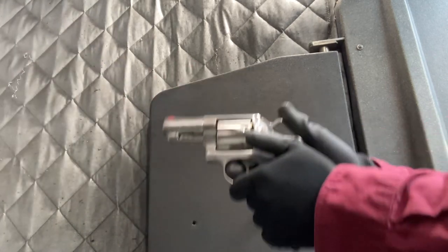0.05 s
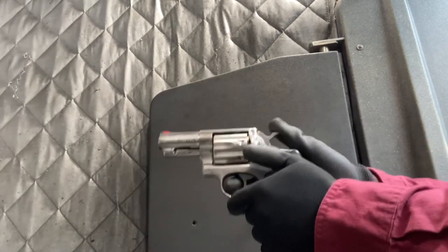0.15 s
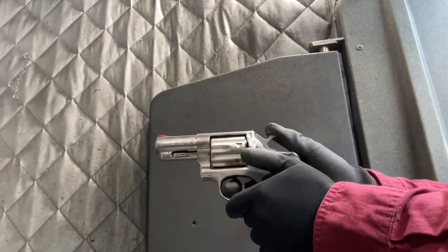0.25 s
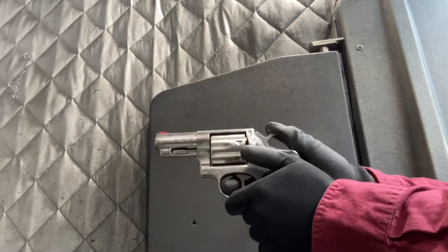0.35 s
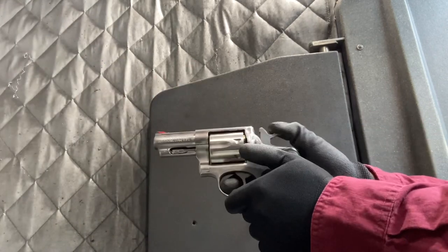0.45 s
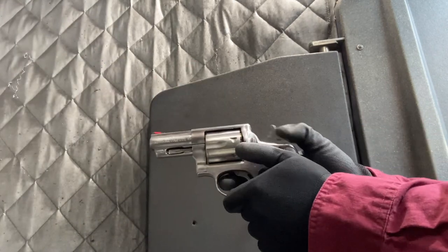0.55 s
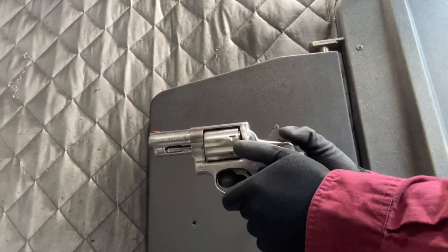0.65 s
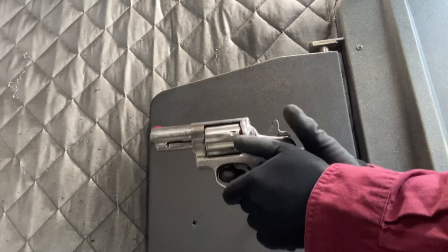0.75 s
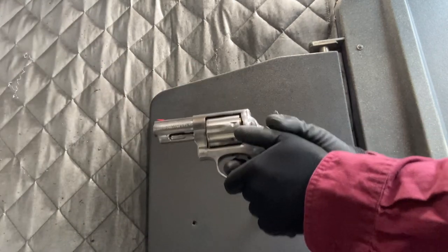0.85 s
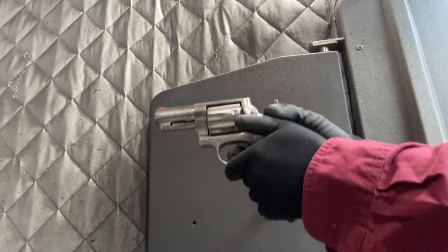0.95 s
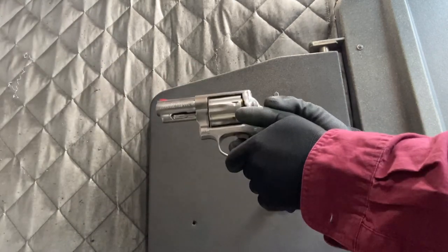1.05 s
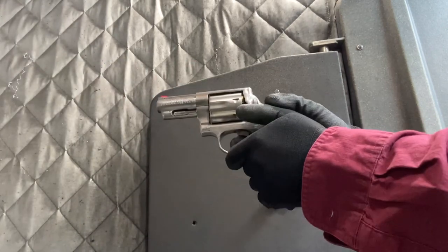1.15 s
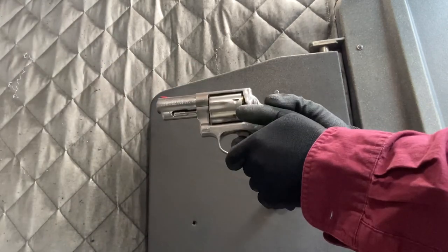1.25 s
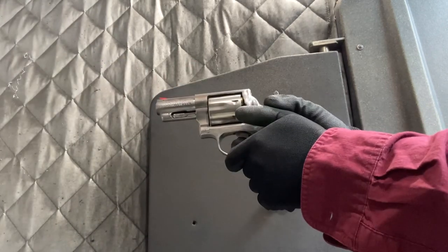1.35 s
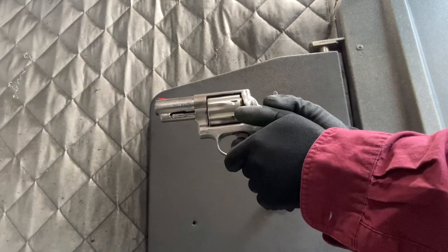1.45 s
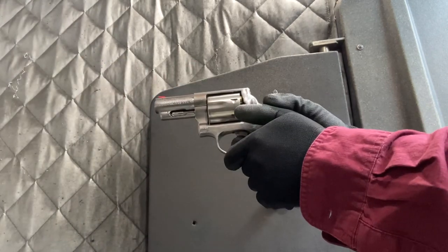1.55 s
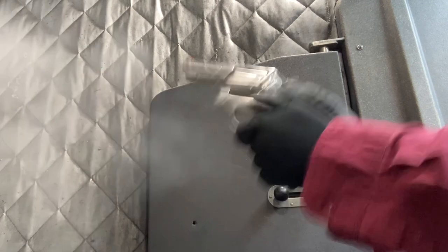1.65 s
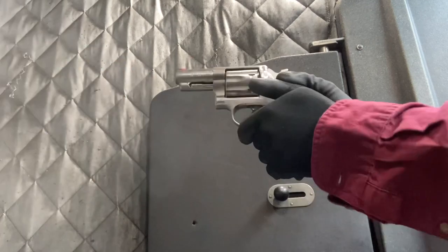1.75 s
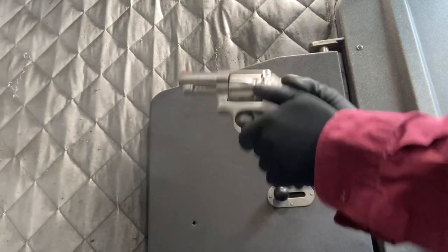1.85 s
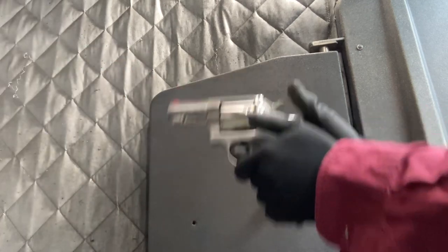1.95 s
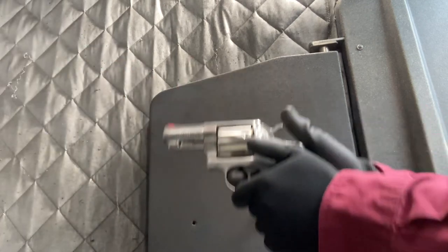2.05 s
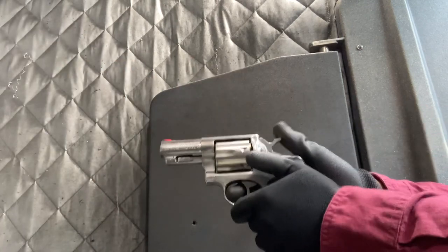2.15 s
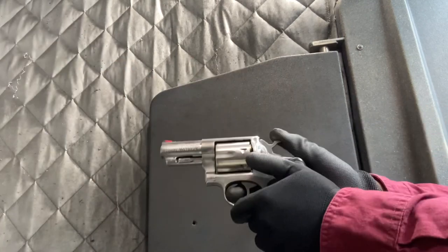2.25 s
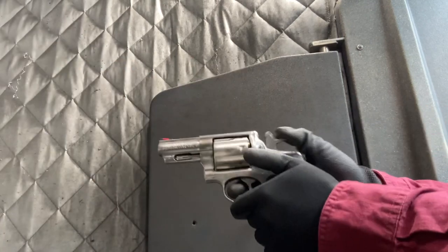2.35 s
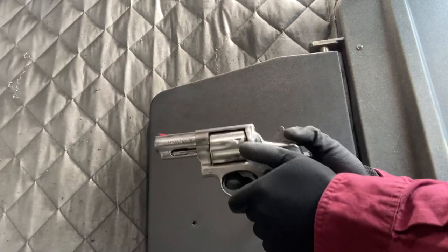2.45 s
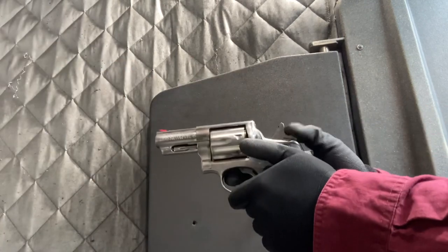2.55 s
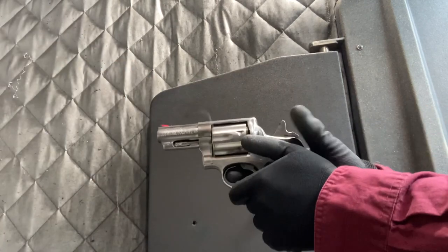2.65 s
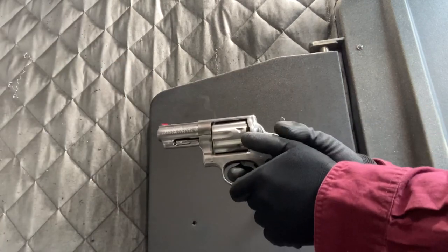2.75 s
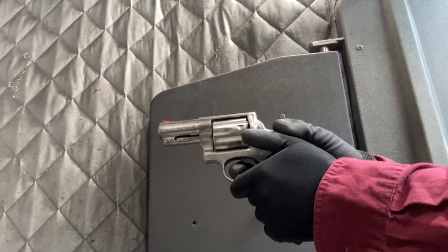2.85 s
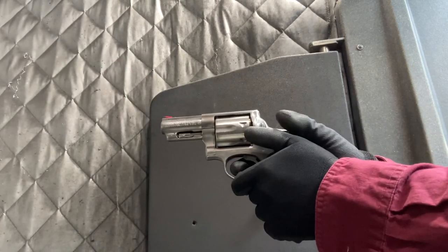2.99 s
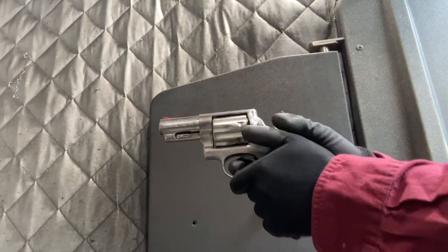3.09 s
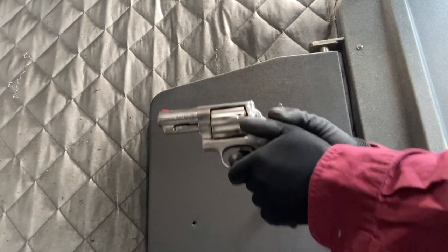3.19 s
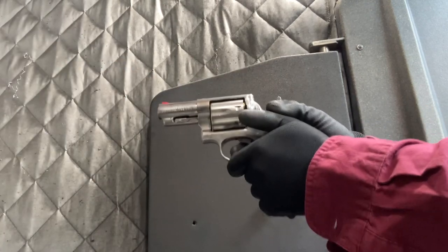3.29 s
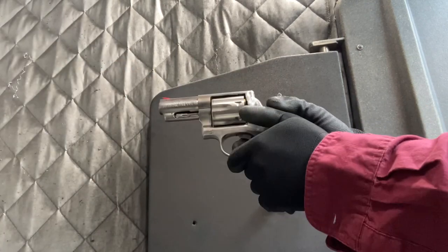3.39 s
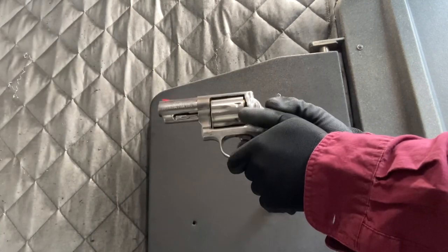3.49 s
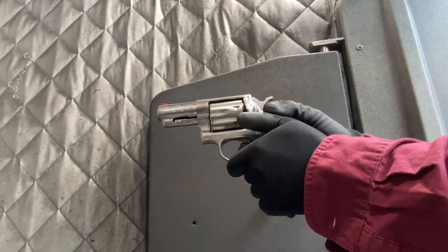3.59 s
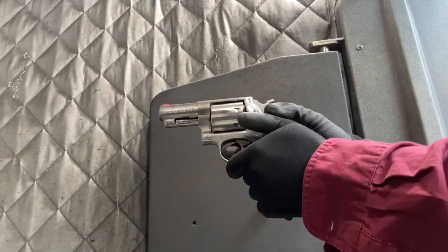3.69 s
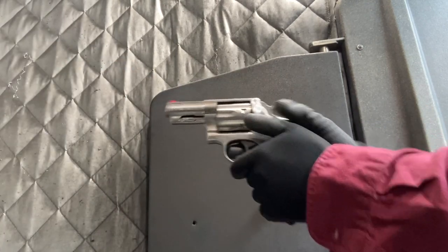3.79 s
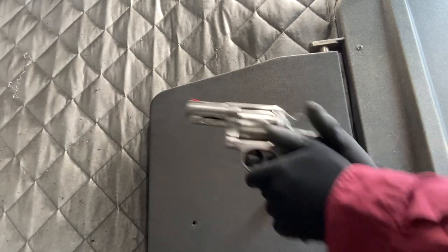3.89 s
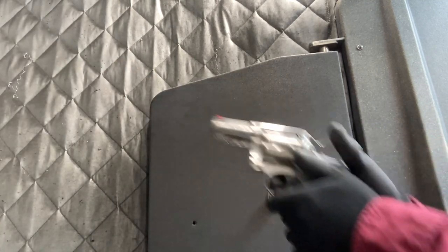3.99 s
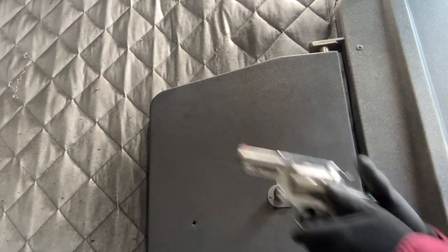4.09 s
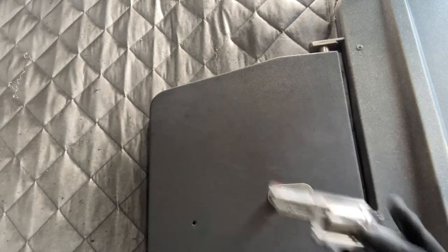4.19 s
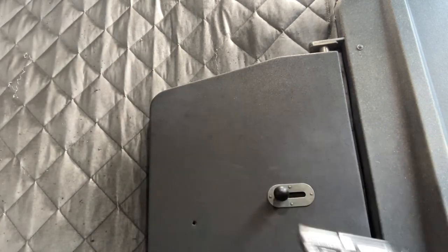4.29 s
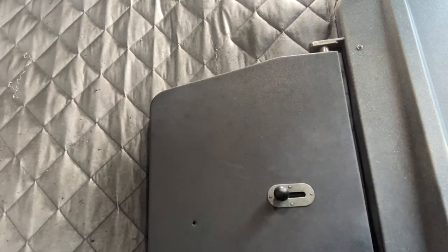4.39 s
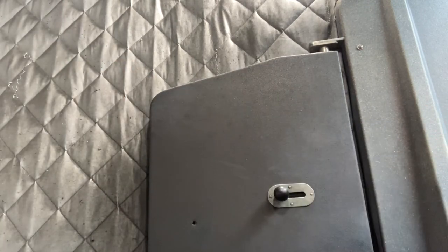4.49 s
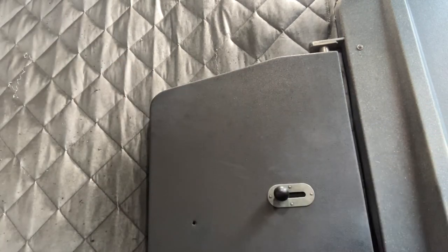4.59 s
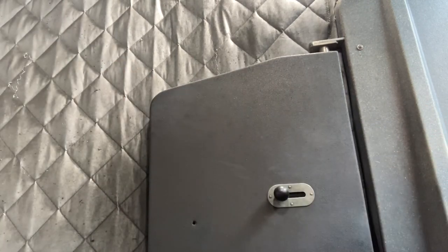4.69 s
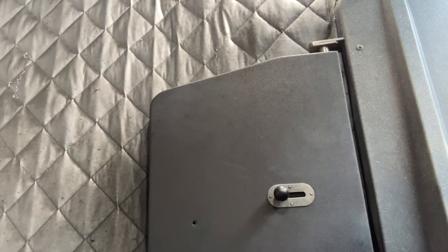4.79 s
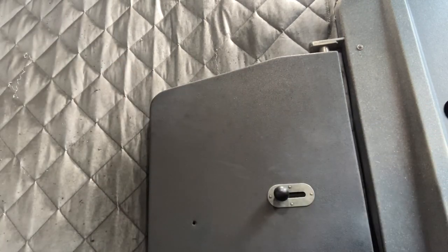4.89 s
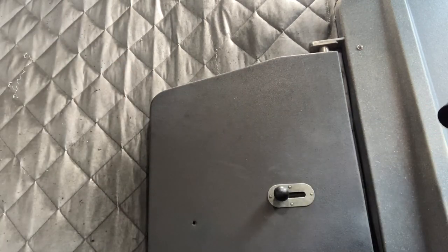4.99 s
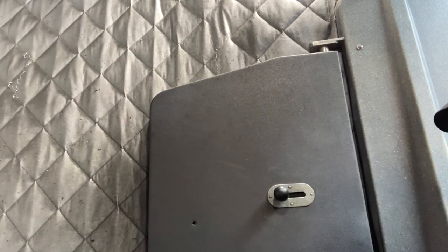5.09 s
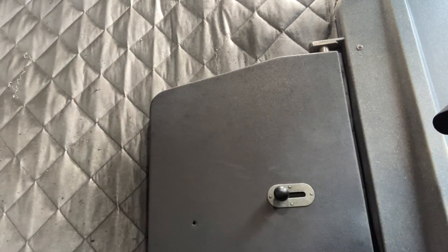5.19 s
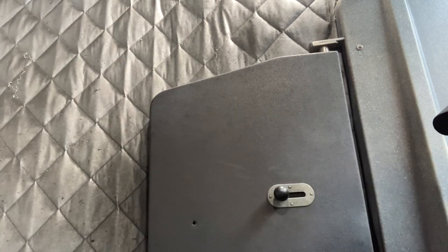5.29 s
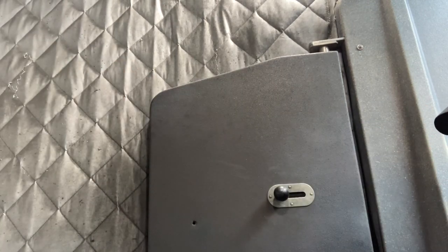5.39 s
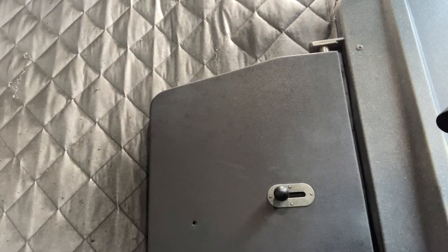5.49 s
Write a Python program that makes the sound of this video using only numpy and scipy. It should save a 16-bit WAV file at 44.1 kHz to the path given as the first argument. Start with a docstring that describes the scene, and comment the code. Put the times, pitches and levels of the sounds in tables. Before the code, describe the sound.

At 0 seconds the hall is already ringing with the tail of a revolver shot fired just before, a dense roar that fades steadily. Around 0.53 to 0.6 seconds the hammer is cocked: very small, bright steel clicks partly buried in the echo. At 1.64 seconds the gun fires once, an abrupt, overloaded crack with a deep boom and hard booth rattle, followed about a tenth of a second later by a slap from down range. A broad hall echo rings on for well over a second, losing treble first. Soft cocking clicks come at 2.4 to 2.47. At 3.52 the hammer drops on a spent chamber, a crisp metallic snap without a blast, then a smaller trigger reset click near 3.7. Low ventilation rumble with faint unsteady fan tones runs throughout and is exposed at the end, with soft sleeve brushing from 4.8 and faint distant metal ticks until about 5.5.

```python
"""Revolver in a padded range booth

A revolver fires in a padded booth of an indoor range, while the shot before it still rings in the hall.
Blasts are a pressure pulse plus coloured noise bursts: booth rattle, low boom, a slap from down range, a tail.
The hammer is cocked after each; a later pull only snaps it on a spent chamber and the trigger resets. These
clicks are noise cracks and ringing frame modes. A sleeve brushes and the gun ticks faintly, as shaped noise.
Ventilation rumbles throughout, as coloured noise with wavering fan tones."""
import sys
import numpy as np
from scipy import signal
from scipy.fft import rfft, irfft, next_fast_len
from scipy.io import wavfile
from scipy.ndimage import uniform_filter1d, minimum_filter1d, map_coordinates

SR = 44100
rng = np.random.default_rng(int(sys.argv[2]) if len(sys.argv) > 2 else 0)


def digitize_waveform(pressure):
    """Quantize a signal to 16-bit integers and store it at the path in sys.argv[1].

    Rows of a 2-D input are taken as channels; values are limited to [-1, 1].
    """
    field = np.atleast_2d(pressure).T
    bounded = np.clip(field, -1, 1)
    quanta = np.round(bounded * 32767).astype(np.int16)
    wavfile.write(sys.argv[1], SR, quanta)


N = 244311  # length in samples


def amp(db):
    """Decibels to linear gain."""
    return 10 ** (np.asarray(db) / 20)


def unit(x):
    """Scale to rms 1."""
    return x / np.sqrt(np.mean(x ** 2) + 1e-20)


def along(points, hz):
    """Read a curve of (f/Hz, value) points on a log frequency axis."""
    f, value = np.transpose(points)
    return np.interp(np.log(hz + 1), np.log(f + 1), value)


def add(track, s, sound):
    """Mix a sound in from time s, which may lie before the start."""
    at = round(s * SR)
    part = sound[:, max(-at, 0):N - at]
    start = max(at, 0)
    track[:, start:start + part.shape[1]] += part


def wobble(rate):
    """A smooth random curve with rate knots a second."""
    knots = rng.standard_normal(int(N * rate / SR) + 4)
    return map_coordinates(knots, [np.arange(N) * rate / SR])


def fade(t, t60):
    """Exponential decay: falls 60 dB in t60 seconds."""
    return np.exp(-np.log(1000) * t / t60)


def burst(t, rise, t60):
    """Silent before t = 0, then a quick swell and a decay."""
    t = np.maximum(t, 0)
    return (1 - np.exp(-t / rise)) * fade(t, t60)


def filtered(x, gain):
    """Pass x through a gain that depends on frequency."""
    size = next_fast_len(x.shape[1] + SR // 4)
    hz = np.fft.rfftfreq(size, 1 / SR)
    return irfft(rfft(x, size) * gain(hz), size)[:, :x.shape[1]]


# Default stereo width, likeness of left and right: (f/Hz, correlation)
STEREO_LIKENESS = [(60, .92), (140, .85), (240, .25), (440, .15), (560, -.55), (1300, -.3), (2400, 0),
                   (6000, .05)]


def noise(size, spectrum, modes=(), alike=STEREO_LIKENESS):
    """Stereo noise of rms 1: a colour, resonant peaks, and a left-right correlation set by frequency."""
    hz = np.fft.rfftfreq(size, 1 / SR)
    peaks = sum(db / (1 + (2 * (hz - f) / width) ** 2) for f, width, db in modes)
    colour = along(spectrum, hz) + peaks
    # the mid/side balance sets the correlation
    turn = np.arccos(np.clip(along(alike, hz), -1, 1)) / 2
    white = rfft(rng.standard_normal((2, size)))
    mid, side = irfft(white * amp(colour) * [np.cos(turn), np.sin(turn)], size)
    return unit(np.array([mid + side, mid - side]))


# How long the hall rings: (f/Hz, t60/s)
HALL_DECAY = [(60, 1.3), (150, 1.25), (400, 1.312), (1200, 1.448), (3000, 1.29), (5500, 1.124),
              (8000, 0.86), (12000, 0.61), (16000, 0.32)]


def in_hall(x):
    """Each frequency dies at its own speed; the air takes the treble first."""
    hz, t, bins = signal.stft(x, SR, nperseg=512)
    t60 = along(HALL_DECAY, hz)[:, None]
    return signal.istft(bins * fade(t, t60), SR, nperseg=512)[1][:, :x.shape[1]]


def walls(x, db, reach, count):
    """A few close reflections, different in each channel, comb the sound."""
    taps = np.zeros((2, SR // 10))
    delays = ((.001 + reach * rng.random((2, count))) * SR).astype(int)
    signs = rng.choice([-1, 1], (2, count))
    np.put_along_axis(taps, delays, amp(db) * signs, axis=1)
    # long waves bend round the panels
    high_pass = signal.butter(2, 600, "high", fs=SR, output="sos")
    taps = signal.sosfilt(high_pass, taps)
    taps[:, 0] = 1  # direct sound
    return signal.fftconvolve(x, taps / np.linalg.norm(taps[0]), axes=1)[:, :x.shape[1]]


# Colour of the blast in the booth: (f/Hz, level/dB per Hz)
BOOTH_COLOUR = [(25, -19), (60, -6), (115, -6.5), (200, 0.5), (330, 0), (650, 0.5), (1000, -3), (2000, -4),
                (3500, -10), (6000, -12.5), (8300, -13), (10000, -12), (12000, -15), (15500, -22)]
# Resonances that stand out of the booth: (f/Hz, width/Hz, level/dB)
BOOTH_PEAKS = [(218, 17, 4), (286, 22, 5), (359, 39, 7), (941, 49, 8), (1397, 46, 7), (1609, 23, 5),
               (1887, 45, 6), (2220, 64, 8), (2370, 44, 4.5), (2490, 36, 5), (3530, 53, 6.5)]
# Colour of the hall's answer: (f/Hz, level/dB per Hz)
HALL_COLOUR = [(25, -21.5), (60, -3.5), (130, -3.5), (300, -2), (600, -0.4), (1100, -2), (2200, -3.5),
               (4000, -6), (6000, -7), (7200, -10.5), (8500, -11), (10000, -12), (12000, -13.5),
               (15500, -20.5)]
# Resonances that stand out of the hall: (f/Hz, width/Hz, level/dB)
HALL_PEAKS = [(332, 50, 4), (412.8, 55, 5.8), (704, 75, 2.6), (937, 80, 3.6), (1087, 60, 4),
              (1310, 65, 2.5), (1430, 50, 3)]
# The muzzle points left: (f/Hz, left minus right level/dB)
MUZZLE_TILT = [(300, -1), (800, 5), (2400, 6), (4400, 3), (8000, 1)]


def shot():
    """Muzzle pressure pulse and gas, dense booth reflections, a slap from down range and the long hall tail."""
    size = 2 * SR
    t = np.arange(size) / SR
    u = t / .0004
    blast = amp(-6) * (1 - u) * np.exp(-u)  # overpressure, then suction

    gas_likeness = [(110, 1.0), (250, 0.72), (700, 0.7), (2400, .1), (5000, 0)]  # f/Hz, correlation
    gas = noise(size, BOOTH_COLOUR, BOOTH_PEAKS, alike=gas_likeness)
    gas = filtered(gas, lambda hz: amp(np.outer([.5, -.5], along(MUZZLE_TILT, hz))))
    near = amp(-1) * burst(t, rise=0.0033, t60=0.095) * gas
    booth = amp(-11) * burst(t, rise=.005, t60=.42) * noise(size, BOOTH_COLOUR, BOOTH_PEAKS)

    # the low push of the gas swells later than the crack, and booms on
    boom_colour = [(30, -20), (85, -8.5), (150, 0), (270, -1.5), (450, -24), (1500, -71.5)]  # f/Hz, level/dB
    low_push = noise(size, boom_colour, alike=[(100, 1.0), (300, 0.84)])
    boom = amp(-18) * burst(t - .004, rise=0.0067, t60=0.48) * low_push

    # the hall fills up slowly, as the sound comes back from down range
    tail = in_hall(noise(size, HALL_COLOUR, HALL_PEAKS))
    hall = amp(-9.5) * (1 - np.exp(-t / 0.046)) * tail

    # the far wall throws the blast straight back
    slap = amp(-4.5) * burst(t - .0895, rise=.0035, t60=0.11) * noise(size, BOOTH_COLOUR, BOOTH_PEAKS)
    return slap + walls(blast + near + booth + boom + hall, db=-15, reach=.014, count=7)


# Shots, the first fired before the start: (t/s, relative level/dB)
SHOT_TIMES = [(-0.36, 0), (1.641, -1)]


def gunfire():
    """Every shot scatters through booth and hall anew."""
    out = np.zeros((2, N))
    for s, db in SHOT_TIMES:
        add(out, s, amp(db) * shot())
    return out


# Colour of the ventilation: (f/Hz, level/dB per Hz)
AIR_COLOUR = [(12, -38), (20, -10.5), (50, -2.5), (88, -7.5), (107, -12.5), (154, -12.5), (185, -14.5),
              (260, -15), (700, -21), (1330, -28.5), (3000, -38), (6700, -52.5), (16000, -68)]
# Fan tones: (f/Hz, mean level/dB)
FAN_TONES = [(53, -69), (86, -73.5), (148, -71.5)]
AIR_DB, AIR_WANDER_DB = -62.1, .4  # mean level of the rush, and how far the flow wanders


def ventilation():
    """Duct rumble and air rush as coloured noise, with fan tones unsteady in level and phase."""
    t = np.arange(N) / SR
    likeness = [(60, 0.94), (200, 0.67), (500, -0.11), (1000, -0.3), (5000, 0.26)]  # f/Hz, correlation
    duct_peaks = [(315, 27, 2.5), (418.1, 51, 4)]  # f/Hz, width/Hz, level/dB
    rush = noise(next_fast_len(N), AIR_COLOUR, duct_peaks, alike=likeness)[:, :N]
    tones = np.zeros(N)
    for hz, db in FAN_TONES:
        level = amp(db + 0.72 * wobble(9.4))
        tones += level * np.sin(2 * np.pi * hz * t + 1.2 * wobble(2.5))
    return amp(AIR_DB + AIR_WANDER_DB * wobble(3.8)) * rush + tones


def ring(t, hz, t60):
    """One struck mode: a decaying sine with its own phase in each channel."""
    phase = rng.random((2, 1))
    return np.sin(2 * np.pi * (hz * t + phase)) * burst(t, rise=.0003, t60=t60)


# Colour of a lockwork click: (f/Hz, level/dB per Hz)
CLICK_COLOUR = [(100, -10), (600, -16.5), (1150, -9), (1800, -9.5), (4000, -10), (7000, -10), (8500, -7),
                (11500, -10.5), (14200, -5), (16000, -6)]
# Damped resonances of the lockwork: (f/Hz, width/Hz, level/dB)
CLICK_PEAKS = [(2380, 700, 6.5), (5750, 600, -1), (9820, 1000, 15), (14200, 700, 6), (15500, 830, 2)]
# The nearest booth surfaces throw the clicks back: (delay t/s, relative level/dB)
PANEL_ECHOES = [(.0056, -10), (.0078, -7), (0.0126, -12)]
# Ringing modes of the steel frame: (f/Hz, relative level/dB, t60/s)
FRAME_MODES = [(1238, -8, 0.058), (2240, -13, 0.065), (2440, -6, 0.076), (3140, -22, .06),
               (4670, -14, 0.066), (5800, -12, 0.075), (7150, -18, .05), (8700, -6, 0.045),
               (9300, 0, 0.036), (9840, 3, .035), (13130, -4, .045), (15400, -4, .035)]


def contact(db, weight_db):
    """Steel meets steel: a crack and the frame's ring, answered by booth and hall."""
    t = np.arange(SR) / SR
    strikes = np.zeros(SR)
    for delay, level in [(0.00028, 0)] + PANEL_ECHOES:  # direct strike, then its echoes
        strikes += amp(level) * burst(t - delay, rise=0.00064, t60=0.0057)
    likeness = [(500, 0.7), (2000, -0.8), (4000, -0.4), (6000, -0.6)]  # f/Hz, correlation
    crack = amp(13.5) * strikes * noise(SR, CLICK_COLOUR, CLICK_PEAKS, alike=likeness)

    # each strike excites the modes a little differently
    modes = sum(amp(level + rng.normal(0, 1)) * ring(t, hz, t60) for hz, level, t60 in FRAME_MODES)
    frame = amp(-9) * modes
    booth = amp(-6.5) * burst(t, rise=.002, t60=0.085) * noise(SR, CLICK_COLOUR, CLICK_PEAKS)
    hall = amp(-32) * (1 - np.exp(-t / .01)) * in_hall(noise(SR, CLICK_COLOUR, CLICK_PEAKS))
    click = crack + frame + booth + hall

    # a light contact stirs mostly the high modes
    high_pass = signal.butter(2, 6500, "high", fs=SR, output="sos")
    bright = signal.sosfiltfilt(high_pass, click)
    weight = amp(weight_db)
    return amp(db) * (weight * click + (1 - weight) * bright)


# Contacts of two cockings, a dry snap and a trigger reset:
# (part, t/s, relative level/dB, weight of the low modes/dB)
LOCK_CONTACTS = [("slack", 0.529, -64, -7), ("stop", 0.5685, -51, -1), ("sear", 0.5925, -49.5, -11),
                 ("slack", 2.3975, -67, -14), ("stop", 2.429, -48, -9), ("sear", 2.467, -51.5, -1),
                 ("hammer", 3.517, -27.5, -5), ("slack", 3.6795, -62, -7), ("sear", 3.6974, -44.5, -9)]
SPRING_HZ, SPRING_DB, SPRING_T60 = 11460, -63, 0.13  # small spring: f/Hz, level/dB, t60/s


def lockwork():
    """Slack, cylinder stop, sear and hammer click as steel contacts; each sear catch sets a spring ringing."""
    out, t = np.zeros((2, N)), np.arange(SR) / SR
    for part, s, db, weight_db in LOCK_CONTACTS:
        add(out, s, contact(db, weight_db))
        if part == "sear":
            add(out, s, amp(SPRING_DB) * ring(t, SPRING_HZ, SPRING_T60))
    return out


# A sleeve brushes along as the arms draw back: (t/s, relative level/dB, length/s)
SLEEVE_BRUSHES = [(4.77, -73, .25), (5.0, -73.5, .8)]
# Colour of the cloth: (f/Hz, level/dB per Hz)
CLOTH_COLOUR = [(100, -4), (400, 2), (1200, -7), (2500, -12), (5000, -18), (9000, -27), (16000, -42)]


def sleeve():
    """Each brush of cloth is soft noise that swells and fades with the arm's movement."""
    out = np.zeros((2, N))
    for s, db, length in SLEEVE_BRUSHES:
        size = int(length * SR)
        add(out, s, amp(db) * np.hanning(size) * noise(size, CLOTH_COLOUR))
    return out


# The gun is handled further off: (t/s, relative level/dB)
HANDLING_TICKS = [(4.848, -74), (5.12, -75.5), (5.2425, -60), (5.2595, -63), (5.398, -69), (5.4745, -60)]
# Colour of the distant ticks: (f/Hz, level/dB per Hz)
FAR_CLICK_COLOUR = [(300, -14), (1500, -9), (4000, -7), (5200, -2.5), (8500, -5.5), (10500, -6),
                    (12800, -3.5), (14500, -25)]


def handling():
    """Faint ticks from the drawn-back gun: short noise bursts with a roomy tail."""
    out, t = np.zeros((2, N)), np.arange(SR // 2) / SR
    for s, db in HANDLING_TICKS:
        tick = burst(t, rise=.0005, t60=0.022)
        room = amp(-15) * burst(t, rise=.004, t60=.2)
        grain = noise(len(t), FAR_CLICK_COLOUR, modes=[(5700, 390, 9.3)])
        add(out, s, amp(db) * (tick + room) * grain)
    return out


def scene():
    """The gun, the shooter and the ventilation together in the booth."""
    return gunfire() + lockwork() + handling() + sleeve() + ventilation()


SHARED_ABOVE_HZ, LEFT_LAG_S = 6900, .000247  # crossover, and lag of the left channel


def shared_treble(x):
    """Above the crossover the left channel is a delayed copy of the right."""
    def own(hz):
        """Low-pass for the left channel's own sound."""
        return 1 / np.sqrt(1 + (hz / SHARED_ABOVE_HZ) ** 40)

    def copy(hz):
        """Matching high-pass with the lag, for the copied treble."""
        return np.sqrt(1 - own(hz) ** 2) * np.exp(-2j * np.pi * hz * LEFT_LAG_S)

    left, right = x[:1], x[1:]
    return np.vstack([filtered(left, own) + filtered(right, copy), right])


def gain_control(x, limit_db, hold, release_db):
    """A loud sound pulls the gain down; it is held, then recovers by release_db a second."""
    t = np.arange(N) / SR
    power = uniform_filter1d(np.mean(x ** 2, 0), size=400)
    level = 10 * np.log10(np.abs(power) + 1e-12)
    cut = np.minimum(limit_db - level, 0)
    half = int(hold * SR / 2)
    held = minimum_filter1d(cut, 2 * half + 1, origin=half, mode="constant")
    # a running minimum against a rising ramp gives the steady recovery
    ramp = release_db * t
    return x * amp(np.minimum.accumulate(held - ramp) + ramp)


TOP_HZ = 16000  # upper band limit


def record(dry):
    """Shared treble, gain control, soft overload and a steep band limit."""
    x = gain_control(shared_treble(dry), limit_db=-10.0, hold=0.3, release_db=41)
    x = x / (1 + np.abs(x / .95) ** 4) ** (1 / 4)  # peaks round off towards .95
    return filtered(x, lambda hz: 1 / np.sqrt(1 + (hz / TOP_HZ) ** 180))


dry = scene()
out = record(dry)
digitize_waveform(out)
```